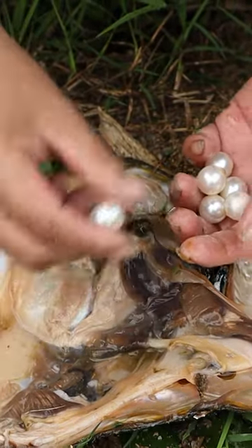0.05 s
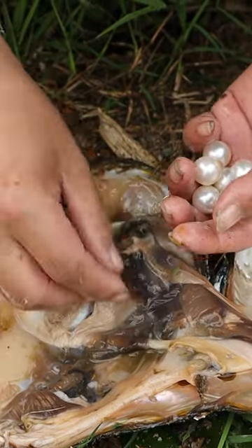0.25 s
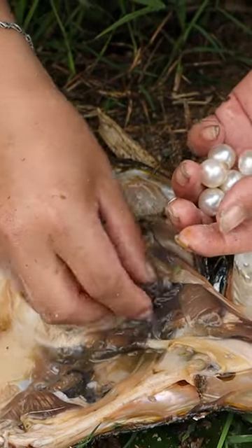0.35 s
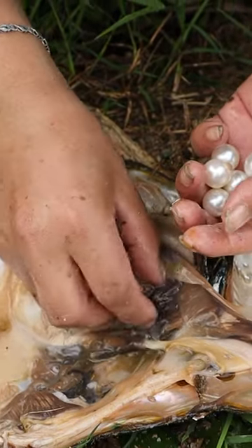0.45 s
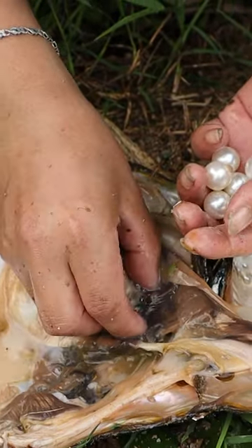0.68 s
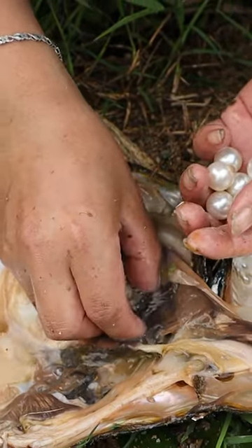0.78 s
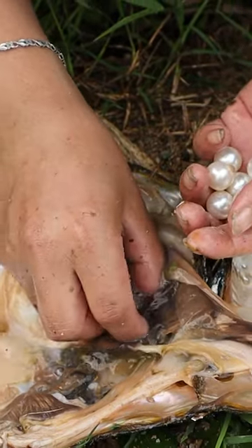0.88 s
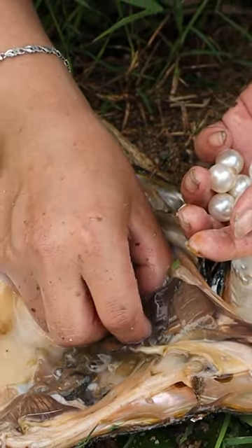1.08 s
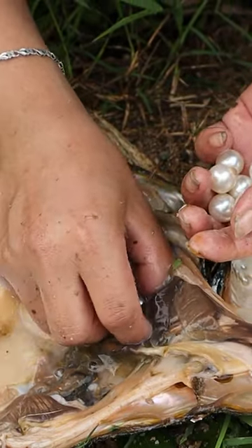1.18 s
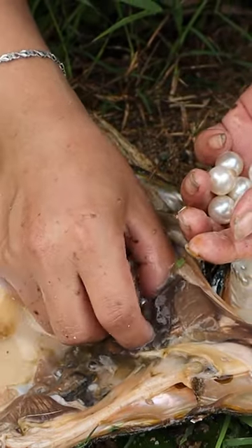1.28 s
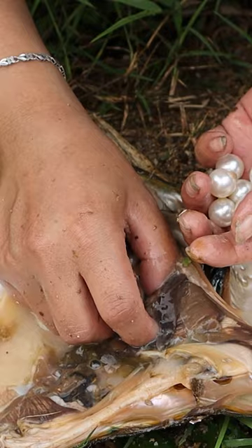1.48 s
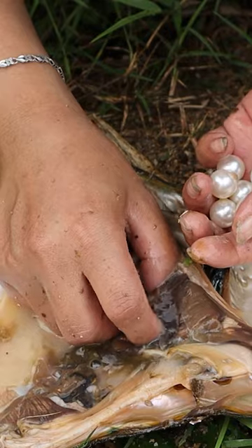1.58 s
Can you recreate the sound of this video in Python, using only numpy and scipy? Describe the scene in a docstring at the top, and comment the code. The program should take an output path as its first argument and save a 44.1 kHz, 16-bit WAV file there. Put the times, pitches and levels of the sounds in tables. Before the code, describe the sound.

A sharp click of pearls knocking together, over quiet outdoor air and faint birdsong.

```python
"""Quiet outdoor air and a low hum that swells and fades run throughout; small birds chirp in the trees.
Fingers brush over pearls in a cupped hand. At 0.24 s the pearls meet in one hard click and a few
quick rebounds, each contact briefly ringing their modes. A softer touch follows at 0.39 s,
then a dull tap and a last brush. From that touch on, a second bird adds thin rising whistles."""
import sys
import numpy as np
from scipy import signal
from scipy.fft import rfft, irfft
from scipy.io import wavfile
from scipy.ndimage import map_coordinates

SR = 44100
rng = np.random.default_rng(int(sys.argv[2]) if len(sys.argv) > 2 else 0)


def int16_out(signal):
    """Quantize to a 16-bit WAV file."""
    q = np.round(np.clip(np.atleast_2d(signal).T, -1, 1) * 32767)
    wavfile.write(sys.argv[1], SR, q.astype(np.int16))


N = 72765
TIME = np.arange(N) / SR


def from_db(db):
    """Decibels to gain."""
    return 10 ** (np.asarray(db) / 20)


def unit_rms(x):
    """Scale to rms 1."""
    return x / np.sqrt(np.mean(x ** 2) + 1e-20)


def at_hz(points, hz):
    """Interpolate a table on a log-frequency axis."""
    table_hz, value = np.transpose(points)
    return np.interp(np.log(np.maximum(hz, 1)), np.log(table_hz), value)


def drift(rate_hz):
    """Random wander of rms 1, low-passed at rate_hz."""
    step, settle = 20, 2000  # samples per point, points discarded
    pole = np.exp(-2 * np.pi * step * rate_hz / SR)
    noise = rng.standard_normal(N // step + settle + 2)
    slow = signal.lfilter([1], [1, -2 * pole, pole * pole], noise)[settle:]
    return np.interp(np.arange(N) / step, np.arange(len(slow)), unit_rms(slow))


def ring(x, hz, t60_s):
    """One damped mode; a unit impulse rings it at amplitude about 1."""
    radius = np.exp(-np.log(1000) / (t60_s * SR))
    angle = 2 * np.pi * hz / SR
    return signal.lfilter([.5, 0, -.5], [1, -2 * radius * np.cos(angle), radius ** 2], x + 1e-18)


def reflections(x, t60_s, onset_s):
    """Dense echoes that build and decay, different at each ear; unit energy."""
    t = TIME[:SR // 2]
    build = 1 - np.exp(-(t / onset_s) ** 2)
    tail = rng.standard_normal((2, len(t))) * np.exp(-np.log(1000) * t / t60_s) * build
    tail /= np.sqrt(np.sum(tail ** 2, axis=1, keepdims=True))
    return signal.fftconvolve(np.atleast_2d(x), tail, axes=1)[:, :N]


# Air spectrum. Each row: frequency in Hz, relative density in dB.
AIR_SPECTRUM = [(20, -28), (30, -34.5), (40, -5), (60, -4), (110, -3.5), (200, -4), (330, -5), (450, -9),
                (800, -10), (1600, -11.5), (3000, -14.5), (5000, -20), (7000, -25), (9000, -31),
                (14500, -34), (16000, -42.5)]
# Air width. Each row: frequency in Hz, left-right correlation from -1 to 1.
AIR_CORRELATION = [(60, 1), (130, 0.84), (200, 0.66), (350, -0.28), (700, -0.021), (1400, -0.29),
                   (3000, -0.6), (10000, -0.69)]


def air(rms_db=-47):
    """Smooth distant noise, alike at both ears in the bass and wide above."""
    hz = np.arange(N // 2 + 1) * SR / N
    mid, side = rfft(rng.standard_normal((2, N))) * from_db(at_hz(AIR_SPECTRUM, hz))
    correlation = at_hz(AIR_CORRELATION, hz)
    spectrum = np.sqrt(1 + correlation) * mid + np.sqrt(1 - correlation) * side * [[1], [-1]]
    return from_db(rms_db) * unit_rms(irfft(spectrum, N))


# Hum envelope. Each row: time in seconds, relative level in dB.
HUM_ENVELOPE = [(0.0, -64), (0.044, -45.5), (0.17, -58.5), (0.21, -49), (0.358, -59.5), (0.72, -46),
                (0.784, -58.5), (1.006, -48.5), (1.046, -95.5), (1.088, -48.5), (1.184, -50), (1.24, -61),
                (1.328, -46.5), (1.382, -54.5), (1.46, -49.5), (1.484, -59.5), (1.524, -45), (1.65, -53.5)]


def hum(centre_hz=75.9, waver_hz=5.58, drift_rate_hz=8.1, gain_db=-1, flutter_db=1.5, band_db=-61.5):
    """A low tone wavering in pitch and level, with a faint noise band above it."""
    hz = centre_hz + waver_hz * drift(drift_rate_hz)
    level_db = np.interp(TIME, *np.transpose(HUM_ENVELOPE)) + gain_db + flutter_db * drift(drift_rate_hz)
    tone = np.sin(2 * np.pi * np.cumsum(hz) / SR)
    band = ring(rng.standard_normal(N), hz=335.7, t60_s=.07)
    return from_db(level_db) * unit_rms(tone) + from_db(band_db) * unit_rms(band)


def glide(start_s, length_s, start_hz, end_hz, warble, fade_share=.44):
    """Envelope and phase of one gliding bird note."""
    progress = np.clip((TIME - start_s) / length_s, 0, 1)
    fade = np.clip(np.minimum(progress, 1 - progress) / fade_share, 0, 1)
    hz = (start_hz + (end_hz - start_hz) * progress) * warble
    return np.sin(np.pi / 2 * fade), 2 * np.pi * np.cumsum(hz) / SR


# Second bird's whistles. Each row: start in seconds, length in seconds, start pitch in Hz,
# end pitch in Hz, level in dB, octave overtone in dB relative to the note.
BIRD_WHISTLES = [(.394, .075, 6270, 6680, -61.5, -22), (.420, .068, 6800, 7340, -59.5, -22),
                 (.843, .062, 5880, 6240, -59, -18), (.880, .055, 6040, 6290, -65, -2),
                 (1.335, .08, 6780, 7360, -60, -25)]


def bird_whistles(warble_share=.012, echo_db=-3):
    """Thin rising slides with an octave overtone, echoing among the trees."""
    song = np.zeros(N)
    warble = 1 + warble_share * drift(rate_hz=280)
    for *note, level_db, overtone_db in BIRD_WHISTLES:
        envelope, phase = glide(*note, warble)
        song += from_db(level_db) * envelope * (np.sin(phase) + from_db(overtone_db) * np.sin(2 * phase))
    return song + from_db(echo_db) * reflections(song, t60_s=.26, onset_s=.014)


# Twittered notes. Each row: start in seconds, length in seconds, start pitch in Hz,
# end pitch in Hz, level before panning in dB.
BIRD_CHIRPS = [(0.075, 0.051, 3760, 3480, -58.5), (0.119, 0.019, 3270, 3090, -53),
               (0.14, 0.027, 2930, 2936, -51), (0.397, 0.016, 3070, 2940, -49.5),
               (0.438, 0.014, 2964, 2620, -52.5), (.606, 0.015, 3790, 3670, -48.5),
               (0.618, 0.011, 3720, 3850, -53), (0.634, 0.016, 4220, 4070, -48.5),
               (0.650, 0.019, 3340, 3220, -46.5), (0.664, 0.018, 4050, 3930, -51.5),
               (0.667, 0.03, 3670, 3450, -48.5), (.668, 0.021, 3150, 3230, -51),
               (0.689, 0.022, 3300, 3457, -46.5), (0.716, .02, 3560, 3520, -55.5),
               (0.855, 0.063, 2032, 2152, -50.5), (0.917, 0.014, 3110, 2920, -47),
               (0.938, 0.047, 2940, 2800, -57), (1.069, 0.0078, 4200, 3980, -52),
               (1.08, 0.0097, 3990, 3960, -54), (1.088, 0.03, 3234, 3070, -49.5),
               (1.11, 0.013, 3760, 3450, -46.5), (1.125, 0.033, 3414, 3540, -49.5),
               (1.130, 0.029, 3070, 3170, -56), (1.269, 0.016, 3900, 3780, -57.5),
               (1.28, 0.032, 3205, 3087, -48.5), (1.326, 0.015, 2803, 2700, -54.5),
               (1.346, 0.017, 2180, 2090, -55)]


def bird_chirps(warble_share=.017, echo_db=-1, pan_db=2.5):
    """Short warbling glides, left of centre, echoing among the trees."""
    song = np.zeros(N)
    warble = 1 + warble_share * drift(rate_hz=280)
    for *note, level_db in BIRD_CHIRPS:
        envelope, phase = glide(*note, warble)
        song += from_db(level_db) * envelope * np.sin(phase)
    echo = from_db(echo_db) * reflections(song, t60_s=.23, onset_s=.014)
    return (song + echo) * from_db([[pan_db], [-pan_db]])


# Finger strokes. Each row: centre in seconds, width in seconds, top level in dB.
FINGER_STROKES = [(0.032, 0.071, -64), (0.18, 0.061, -64.5), (0.507, 0.007, -57.5)]


def finger_brushes(band_hz=(5910, 15140)):
    """Brief, faint hiss of sliding fingers."""
    bandpass = signal.butter(2, band_hz, "band", fs=SR, output="sos")
    envelope = sum(from_db(level_db) * np.exp(-(2 * (TIME - centre_s) / width_s) ** 2)
                   for centre_s, width_s, level_db in FINGER_STROKES)
    return envelope * unit_rms(signal.sosfilt(bandpass, rng.standard_normal((2, N))))


def near_scatter(direct, gain_db=-15):
    """Fast reflections from close by."""
    return from_db(gain_db) * reflections(direct, t60_s=.016, onset_s=.0005)


# Modes of the tap. Each row: frequency in Hz, gain in dB, t60 in seconds.
DULL_TAP_MODES = [(2070, 3, 0.023), (2250, 0.5, 0.02), (4000, -1, 0.0036), (5900, -16, 0.0037)]


def dull_tap(start_s=.4312, push_db=-39.5, brightness_hz=4000):
    """One soft contact rings a few lower modes."""
    impulse = from_db(push_db) * signal.unit_impulse(N, int(start_s * SR))
    push = signal.sosfilt(signal.butter(2, brightness_hz, fs=SR, output="sos"), impulse + 1e-18)
    direct = sum(from_db(gain_db) * ring(push, hz, t60_s) for hz, gain_db, t60_s in DULL_TAP_MODES)
    return direct + near_scatter(direct)


# Modes of the held pearls. Each row: frequency in Hz, left gain in dB, right gain in dB, t60 in seconds.
PEARL_MODES = [(3308, -12, -8, 0.0014), (4000, -34, -16.5, 0.0088), (5174, -25, -22.5, .007),
               (6040, -19.5, -20.5, .006), (6750, -2, -3.5, 0.0048), (7095, 4.5, 2.5, .0024),
               (8200, 2, -3, 0.0011), (9300, -13.5, -21.5, 0.0046), (9760, -14, -0.5, 0.0025),
               (10340, -9, -14.5, 0.0085), (11650, -3, -7.5, 0.0034), (14200, -4.5, -4.5, 0.003124),
               (15900, -12, -17, 0.0056)]


def pearl_click(start_s, push_db, brightness_hz, t60_ratio, pitch_ratio, bass_cut_hz=1300):
    """A short push rings the modes; a softer contact is duller, a held pearl damped, a small one higher."""
    count, start = SR // 20, int(start_s * SR)
    lowpass = signal.butter(3, brightness_hz, fs=SR, output="sos")
    highpass = signal.butter(2, bass_cut_hz, "high", fs=SR, output="sos")
    push = signal.sosfilt(highpass, signal.sosfilt(lowpass, signal.unit_impulse(count)))
    click = np.zeros((2, count))
    for k, (hz, left_db, right_db, t60_s) in enumerate(PEARL_MODES):
        mode = ring(push, hz * pitch_ratio, t60_s * t60_ratio)
        click += (-1) ** k * from_db([[left_db], [right_db]]) * mode
    return from_db(push_db) * np.pad(click, [(0, 0), (start, N - start - count)])


# Pearl-on-pearl contacts. Each row: start in seconds, push in dB, brightness in Hz,
# ratio on the modes' t60, ratio on their frequency.
PEARL_CONTACTS = [(.2431, -.5, 14500, .9, 1.0), (.2491, -16.5, 15000, .95, .99),
                  (.2501, -23, 14000, .9, 1.02), (.2511, -21, 14000, .85, .97),
                  (.256, -28, 9500, .73, 1.03), (.2573, -23, 8300, .7, 1.03),
                  (.2580, -8.5, 9000, .72, 1.03), (.2651, -23, 6500, .9, 1.03),
                  (.3914, -12.5, 6300, .85, 1.0)]


def pearls(left_lag_s=12e-6, far_db=-41):
    """Pearls collide and rebound slightly to the right, with near and far reflections."""
    direct = sum(pearl_click(*contact) for contact in PEARL_CONTACTS)
    direct[0] = map_coordinates(direct[0], [(TIME - left_lag_s) * SR], order=5)
    near = near_scatter(direct)
    far = from_db(far_db) * reflections(direct, t60_s=.21, onset_s=.005)
    return direct + near + far


def scene():
    """Pearls and fingers close by, birds and background far off."""
    return pearls() + dull_tap() + bird_chirps() + bird_whistles() + air() + hum() + finger_brushes()


def record(dry, cutoff_hz=15800):
    """Clip at full scale, then cut the top treble."""
    lowpass = signal.firwin(101, cutoff_hz, window=("kaiser", 7), fs=SR)
    return signal.fftconvolve(np.clip(dry, -1, 1), lowpass[None], "same", axes=1)


dry = scene()
out = record(dry)
int16_out(out)
```